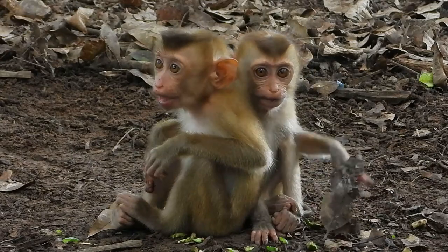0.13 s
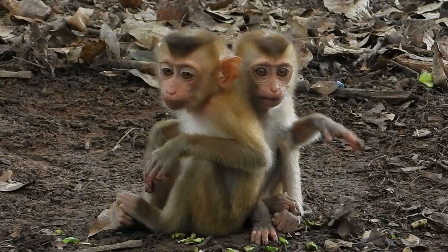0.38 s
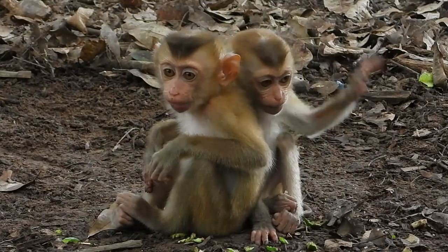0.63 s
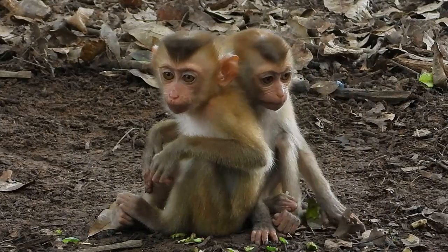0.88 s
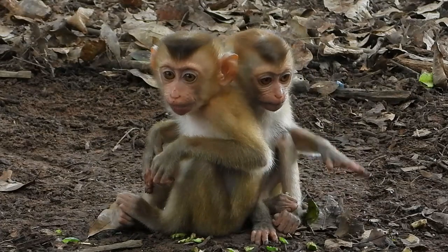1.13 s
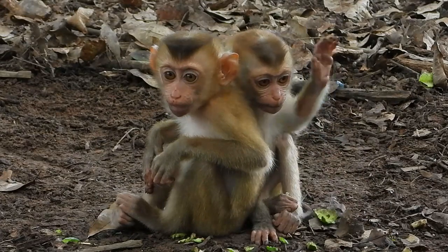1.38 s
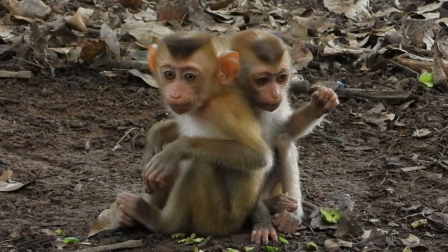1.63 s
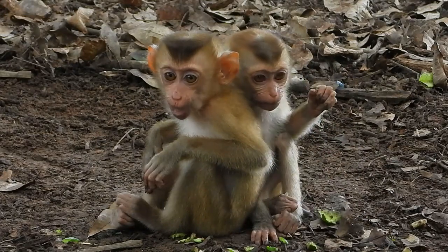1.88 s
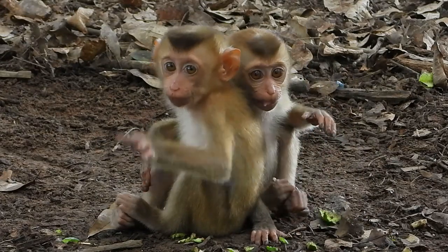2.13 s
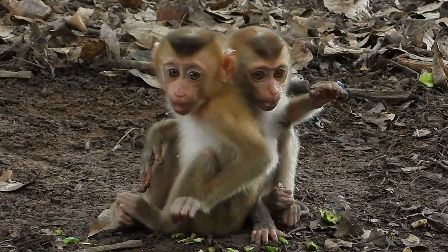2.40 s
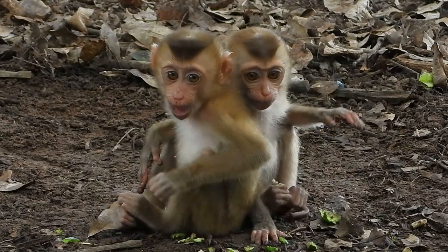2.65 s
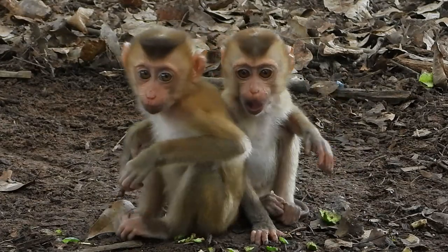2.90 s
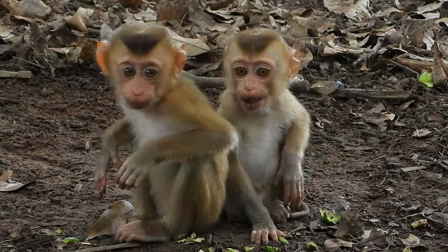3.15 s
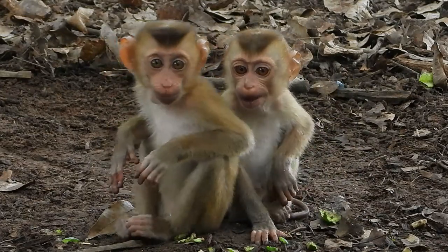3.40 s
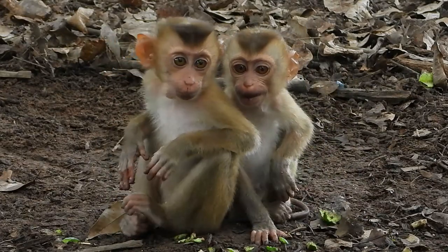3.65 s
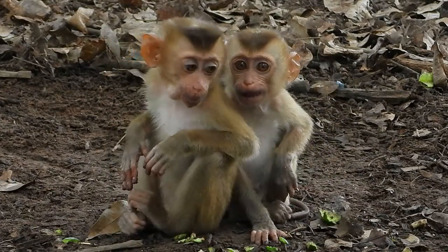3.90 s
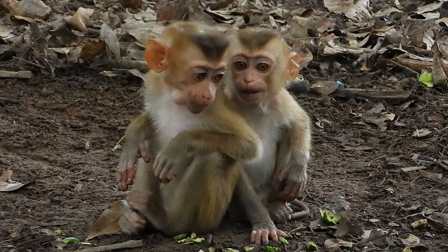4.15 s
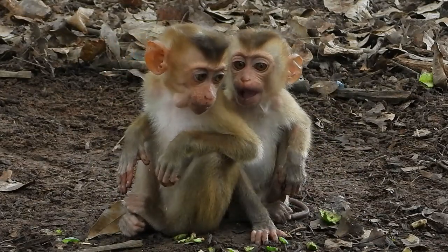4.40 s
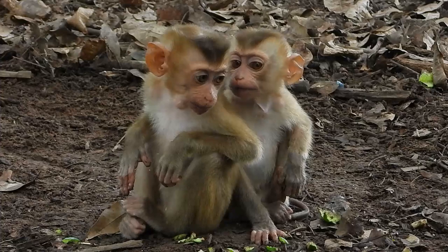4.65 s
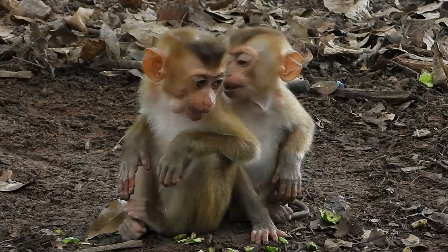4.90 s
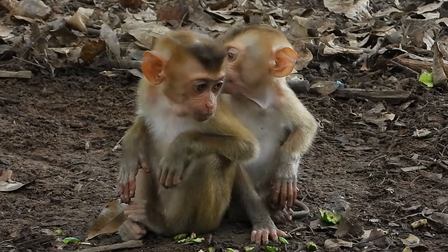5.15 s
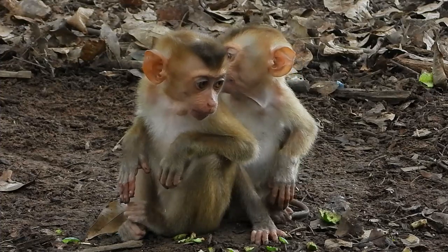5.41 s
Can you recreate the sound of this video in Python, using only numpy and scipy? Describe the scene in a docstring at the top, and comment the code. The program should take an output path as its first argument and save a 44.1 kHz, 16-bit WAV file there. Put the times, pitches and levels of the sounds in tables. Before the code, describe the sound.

Two young monkeys give a few very short, piercing arched whistles over a steady high insect hiss in a leafy forest, with faint frog creaks.

```python
"""Short arched whistles from two young monkeys on bare forest soil ring on between the trees.
Insect choruses, noise shaped by body resonances, hiss and pulse around them; thin tones and a cricket stand out.
A frog creaks in rough, decaying knocks and a bird holds one sine-like note far off.
The far forest is a steady wash of noise, and light wind rocks the two microphone ports at very low pitch."""
import sys
import numpy as np
from scipy import signal
from scipy.fft import rfft, irfft, next_fast_len
from scipy.io import wavfile
from scipy.ndimage import uniform_filter1d, map_coordinates

SR = 44100
rng = np.random.default_rng(int(sys.argv[2]) if len(sys.argv) > 2 else 0)


def boost_factor(decibels):
    """Convert a level in decibels to a linear amplitude factor."""
    exponent = np.asarray(decibels, float) / 20
    return 10 ** exponent


def unload_wav(signal):
    """Save mono or channel-first audio to the path in sys.argv[1] as 16-bit WAV at rate SR, clipped to [-1, 1]."""
    wavfile.write(
        sys.argv[1],
        SR,
        np.round(np.clip(np.atleast_2d(signal).T, -1, 1) * 32767).astype(np.int16),
    )


N = 243873  # length in samples


def unit(x):
    """Scales a sound to an rms of 1."""
    return x / np.sqrt(np.mean(x ** 2) + 1e-20)


def along(points, hz):
    """Reads a curve of (Hz, value) points on a log pitch axis."""
    f, v = np.transpose(points)
    return np.interp(np.log(hz + 1), np.log(f + 1), v)


def curves(rows):
    """Gives one value per sample for each column after the time in seconds."""
    s, *cols = np.transpose(rows)
    return [np.interp(np.arange(N) / SR, s, c) for c in cols]


def wobble(rate):
    """A smooth random curve through `rate` random points a second."""
    knots = rng.standard_normal(int(N * rate / SR) + 4)
    return map_coordinates(knots, [np.arange(N) * rate / SR])


def filtered(x, response):
    """Multiplies the spectrum of x by a response, which may be complex, at each frequency."""
    m = next_fast_len(x.shape[-1] + 8192)
    spectrum = rfft(x, m) * response(np.fft.rfftfreq(m, 1 / SR))
    return irfft(spectrum, m)[..., :x.shape[-1]]


def sides(db):
    """Left and right gains for a left-minus-right level difference in dB."""
    return boost_factor(np.array([db / 2, -db / 2]))


def pair(colour, alike):
    """Stereo noise of rms 1: a shared and an opposed part set how alike left and right are."""
    def response(hz):
        turn = np.arccos(np.clip(along(alike, hz), -1, 1)) / 2
        return colour(hz) * [np.cos(turn), np.sin(turn)]

    mid, side = filtered(rng.standard_normal((2, N)), response)
    return unit(np.array([mid + side, mid - side]))


def pulses(rate, waver, sharp):
    """A pulse train between 0 and 1 whose rate, in pulses per second, drifts slowly."""
    drifting_rate = rate * (1 + waver * wobble(3.2))
    wave = np.cos(2 * np.pi * np.cumsum(drifting_rate) / SR)
    return (.5 + .5 * wave) ** sharp


def tone(hz, unsteady, lead):
    """A sine of rms 1 with wandering phase; left and right are shifted by +lead and -lead radians."""
    steady = 2 * np.pi * np.cumsum(hz + np.zeros(N)) / SR
    phase = steady + unsteady * wobble(25) + rng.uniform(0, 2 * np.pi)
    return np.sqrt(2) * np.sin(phase + np.array([[lead], [-lead]]))


def trees(x, wet_db):
    """A fresh diffuse echo from trunks and leaves, each frequency dying at its own speed."""
    # Each row: pitch in Hz, time to die by 60 dB in seconds.
    die_away = [(2000, 0.69), (4000, 0.33), (5400, 0.4), (6100, 0.52), (7000, 0.37), (12000, 0.2)]
    hz, t, z = signal.stft(rng.standard_normal((2, SR // 2)), SR, nperseg=256)
    decay = boost_factor(-60 * t / along(die_away, hz)[:, None])
    tail = signal.istft(z * decay, SR, nperseg=256)[1]
    # the echo builds up over about 7 ms
    tail = tail * (1 - np.exp(-np.arange(tail.shape[1]) / (SR * 0.007)))
    tail = tail / np.linalg.norm(tail[0])
    return boost_factor(wet_db) * signal.fftconvolve(x[None], tail, axes=1)[:, :len(x)]


def air():
    """The steady wash of the far forest and self-noise, made of coloured noise."""
    # Colour of the wash. Each row: pitch in Hz, relative level in dB.
    air_colour = [(18, -15), (30, -1.5), (120, -3), (250, -7), (430, -6.5), (520, -11.5), (1500, -12.5),
                  (2600, -11), (5000, -10.5), (6300, -11.5), (8200, -19.5), (10500, -23), (12000, -29.5),
                  (15800, -32)]
    # Each row: pitch in Hz, left-right likeness (1 = the same).
    likeness = [(60, 0.34), (120, 0.21), (240, 0.64), (480, 0.58), (950, 0.6), (1890, 0.55), (3770, 0.47),
                (7520, 0.13), (15000, 0.05)]
    # Each row: pitch in Hz, left minus right level in dB.
    lean = [(60, 0.5), (150, 3), (380, 0), (950, -0.5), (2380, -2), (5980, -5.5), (15000, 1)]
    wash = pair(lambda f: boost_factor(along(air_colour, f)) * (f > 12), likeness)
    wash = filtered(wash, lambda f: sides(along(lean, f)))
    return boost_factor(-57.5 + 0.35 * wobble(1.37)) * wash


def wind():
    """Slow pressure swings on the ports, below hearing for the most part."""
    # Strength of the gusts. Each row: time in seconds, level in dB before the 1 dB lift below.
    gusts = [(0.0, -84), (0.14, -60.5), (0.4, -62), (0.46, -68), (1.06, -70), (1.11, -56.5), (1.91, -67.5),
             (2.22, -56.5), (2.85, -82), (2.99, -58.5), (3.85, -81), (3.91, -60), (4.13, -55.5), (4.3, -70),
             (5.02, -57.5), (5.53, -69)]
    level_db = curves(gusts)[0] + 1.0 + 1.5 * wobble(6)
    return boost_factor(level_db) * pair(lambda f: f / (1 + (f / 11) ** 4), [(11, 0.88)])


def insects():
    """Many singers blur into noise inside each body resonance; pulses of varied depth ride on it."""
    # Each row: centre in Hz, width in Hz, level in dB, pulses per second, pulse depth from 0 to 1,
    # left-right likeness, left minus right level in dB.
    choruses = [(3153, 540, -68.5, 365, 0.3, 0.76, -3), (3600, 510, -66.5, 365, 0.9, 0.87, -3.5),
                (4150, 810, -66.5, 760, 0.37, 0.75, -8), (5690, 390, -68.5, 47, 0.36, 0.28, 3),
                (6750, 370, -62.5, 81, 0.2, 0.53, -2.5), (7200, 490, -60, 300, 0.12, 0.23, -1.5),
                (7796, 440, -64.5, 70, 0.48, 0.12, -8), (9040, 1530, -71, 44, 0, 0.05, 1)]
    # Shared swell of the choruses below 5000 Hz; only its changes count. Each row: time in seconds, level in dB.
    swell = [(0.0, -57.5), (0.69, -59), (1.08, -57.5), (1.8, -58), (3.02, -62), (3.88, -58.5), (4.45, -60),
             (4.74, -60.5), (5.53, -60)]
    swell_db = curves(swell)[0]
    swell_db = swell_db - swell_db.mean()
    out = 0
    for hz, width, db, rate, depth, alike, pan_db in choruses:
        body = lambda f: 1 / (1 + ((f - hz) / (width / 2)) ** 4)
        beat = 1 + depth * (2 * pulses(rate, waver=0.011, sharp=0.54) - 1)
        level_db = db + 0.19 * wobble(2.4) + swell_db * (hz < 5000)
        chorus = unit(pair(body, [(hz, alike)]) * beat)
        out = out + boost_factor(level_db) * chorus * sides(pan_db)[:, None]
    return out


def whines():
    """Thin tones, many about 365 Hz apart from the pulsing cicada chorus, and one late wavering chorus band."""
    # Each row: start in seconds, end in seconds, pitch in Hz, level in dB, waver in radians.
    lines = [(0.554, 1.55, 3000, -68, 0.2), (0.897, 1.3, 4090, -68, 0.36), (1.1, 1.347, 3660, -72, .5),
             (1.153, 1.75, 3280, -72, .6), (1.595, 2.05, 3990, -69.5, 0.54), (4.69, 5.5, 3125, -71, 9.9)]
    t, out = np.arange(N) / SR, 0
    for start, end, hz, db, waver in lines:
        fade = np.clip(np.minimum(t - start, end - t) / 0.021, 0, 1)  # 21 ms in and out
        out = out + fade * boost_factor(db + 1.4 * wobble(4.7)) * tone(hz, unsteady=waver, lead=.1)
    return out * sides(-4.5)[:, None]


def cricket():
    """A near cricket: one wing stroke per pulse rings a single high tone."""
    # Loudness of the song. Each row: time in seconds, level in dB.
    song = [(0, -73), (.3, -72), (.8, -63), (1.4, -69), (3.2, -65.5), (3.8, -69), (4.3, -63), (4.7, -68),
            (5.2, -63.5)]
    strokes = pulses(69.8, waver=0.0028, sharp=0.99)
    ringing = unit(strokes * tone(7850, unsteady=1.33, lead=-0.67))
    return boost_factor(curves(song)[0] + 1.3 * wobble(7)) * ringing


def bird():
    """One held sine-like note, far away, that rises to a peak and fades while its level throbs."""
    start_s, peak_s, end_s = 3.84, 3.96, 4.38
    rise_db_per_s, fade_db_per_s = 20, 25
    throb_per_s, throb_db = 5.0, 5
    t = np.arange(N) / SR
    since_peak = t - peak_s
    swell_db = np.minimum(rise_db_per_s * since_peak, -fade_db_per_s * since_peak)
    throb = throb_db * np.cos(2 * np.pi * throb_per_s * since_peak)
    edges = np.clip(np.minimum(t - start_s, end_s - t) / .03, 0, 1)  # 30 ms in and out
    note = tone(1787, unsteady=.25, lead=0.11)
    return boost_factor(-63 + swell_db + throb) * edges * note * sides(-3.0)[:, None]


def frog():
    """Bouts of uneven creaks, each a short rough knock in the throat sac, sagging in pitch, half lost in echo."""
    # Each row: start in seconds, length in seconds, first creak level in dB, last creak level in dB
    # (both before the 2.5 dB lift below), pitch in Hz before the spread and sag.
    bouts = [(.329, 0.079, -58.5, -58, 2173), (1.408, .25, -56, -53, 2160), (2.058, .01, -53.5, -55, 2230),
             (2.191, .08, -52, -64, 2290), (3.821, .2, -59, -59, 2150), (4.07, .06, -54, -59, 2110),
             (4.163, 0.15, -54, -58, 2130)]
    gap_s, gap_spread = .031, .15  # the spread is a share of the gap
    level_spread_db, pitch_spread = 2, 0.038  # the pitch spread is a share of the pitch
    out, t = np.zeros(N + SR), np.arange(SR // 20) / SR
    for start, length, first_db, last_db, hz in bouts:
        chance = rng.standard_normal((12, 3))
        creaks = 1 + round(length / gap_s)
        for k, (late, louder, higher) in enumerate(chance[:creaks]):
            s = start + gap_s * (k + gap_spread * late)
            db = first_db + (last_db - first_db) * k * gap_s / length + level_spread_db * louder
            rasp = 1 + 0.66 * unit(uniform_filter1d(rng.standard_normal(len(t)), 90))
            creak_hz = hz * (1 + pitch_spread * higher)
            ring = np.sin(2 * np.pi * creak_hz * (1.04 * t - 1.22 * t * t))
            # soft onset of about 3 ms, then a fall of 60 dB in 55 ms
            envelope = boost_factor(db + 2.5 - 60 * t / 0.055) * (1 - np.exp(-t / 0.0033))
            out[round(s * SR):][:len(t)] += envelope * rasp * ring
    direct = out[:N]
    return direct * sides(-2.7)[:, None] + trees(direct, wet_db=-5.0)


def monkeys():
    """Each chirp is a nearly pure whistle with a weak octave; near bounces beat against it while it glides."""
    # Each row: arch name, start in seconds, duration factor, pitch factor, level in dB, octave gain in dB.
    chirps = [("high", .041, .99, 1.0, -37.5, 2.3), ("round", 1.41, 0.95, 1.0, -38.5, 2.6),
              ("swoop", 2.335, 0.99, 0.99, -44.5, 2.5), ("high", 2.361, .94, 0.99, -38, 2.5),
              ("round", 4.54, .98, 1.04, -39, -1.5)]
    # Shapes of a chirp. Each row: seconds after the start, pitch in Hz, effort in dB, octave overtone in dB,
    # all before the chirp's own factors and gains.
    arches = dict(high=[(0, 3600, -21, -45), (.007, 4150, -17, -38), (.016, 5050, -2.5, -33),
                        (.027, 5620, 1, -29), (.051, 6120, 0, -22), (.061, 6580, 1, -20),
                        (.069, 6760, -2, -14.5), (.082, 6750, -3, -16), (.09, 5680, -17, -27),
                        (.096, 4340, -12.5, -42), (.102, 3400, -32, -55)], round=[(0, 3346, -31, -45), (.009, 4170, -7, -32),
                                                 (.018, 4700, 0, -30), (.027, 5200, -1, -27),
                                                 (.037, 5540, 3, -27), (.05, 5830, -0.5, -23),
                                                 (.062, 5963, -5, -19), (.073, 6040, -0.5, -15),
                                                 (.082, 5946, -1, -30), (.0895, 4810, -1, -34),
                                                 (.095, 4150, -11, -42), (.099, 3400, -30, -55)], swoop=[(0, 6800, -13, -34),
                                                                           (.004, 6600, 2, -17),
                                                                           (.015, 5450, -3, -15.5),
                                                                           (.027, 4420, -1.5, -24),
                                                                           (.033, 4050, -3, -33),
                                                                           (.037, 3900, -23, -48)])
    # Ground reflection strengthens some whistle pitches and weakens others; the side lean is on the direct sound.
    # Each row: pitch in Hz, gain in dB, left minus right level in dB.
    reflection = [(4070, 0, -3), (4700, 4.5, -5), (5200, -2.5, 3), (5600, 3.5, 10.5), (5820, -3, 0),
                  (6010, 4, -2), (6100, 1, 3), (6750, -0.5, 0)]
    # Bounces off soil and bodies. Each row: delay in ms, left level in dB, right level in dB.
    bounces = [(2.6, -6, -7.5), (4.3, -11.5, -10), (7.7, -11, -7), (12.5, -15, -13), (19, -10, -11.5)]
    # The left port hears the chirps first. Each row: pitch in Hz, lead in radians.
    left_lead = [(4000, 0.52), (5100, 1.22), (6200, 0.38), (12000, 1.75)]
    # Foliage returns some pitches better. Each row: pitch in Hz, gain in dB.
    leaves = [(4000, 6), (5000, 0.5), (6000, 4), (12000, 6)]
    out, t = np.zeros((2, N + SR)), np.arange(SR // 2) / SR
    ground_hz, ground_db, lean_db = np.transpose(reflection)
    for arch, start_s, stretch, higher, level_db, bright_db in chirps:
        s, *cols = np.transpose(arches[arch])
        hz, effort_db, octave_db = [np.interp(t / stretch, s, c) for c in cols]
        hz = higher * uniform_filter1d(hz, size=110)
        whistle_db = effort_db + np.interp(hz, ground_hz, ground_db)

        # a slightly hoarse throat: fast phase jitter, twice as wide on the octave
        jitter = 0.085 * unit(uniform_filter1d(rng.standard_normal(len(t)), 25))
        phase = 2 * np.pi * np.cumsum(hz) / SR + jitter
        whistle = boost_factor(whistle_db) * np.sin(phase)
        octave = boost_factor(octave_db + bright_db) * np.sin(2 * phase)
        sounding = t / stretch < s[-1]
        voice = np.sqrt(2) * boost_factor(level_db) * sounding * (whistle + octave)

        near = voice * sides(np.interp(hz, ground_hz, lean_db))
        for ms, left, right in bounces:
            near = near + np.roll(voice, round(ms * SR / 1000)) * boost_factor([[left], [right]])
        # half the lead forward on the left, half backward on the right
        near = filtered(near, lambda f: np.exp(.5j * along(left_lead, f) * np.array([[1], [-1]])))
        wash = filtered(trees(voice, wet_db=-6.5), lambda f: boost_factor(along(leaves, f)))
        start = round(start_s * SR)
        out[:, start:start + len(t)] += near + wash
    return out[:, :N]


def scene():
    """All voices of the forest floor together."""
    return air() + wind() + insects() + whines() + cricket() + bird() + frog() + monkeys()


def band_limit(x):
    """A steep low-pass at the top of the band."""
    return signal.sosfilt(signal.butter(12, 15850, fs=SR, output="sos"), x)


def record(dry):
    """Removes everything above 15730 Hz and returns the finished sound."""
    finished = filtered(dry, lambda hz: hz < 15730)
    return band_limit(finished)


dry = scene()
out = record(dry)
unload_wav(out)
```